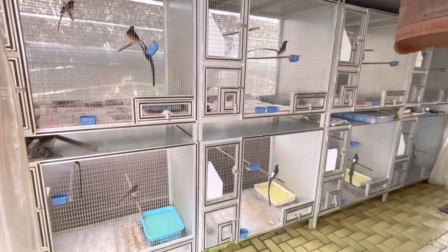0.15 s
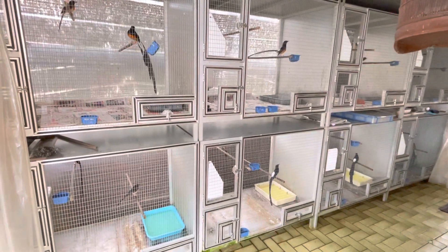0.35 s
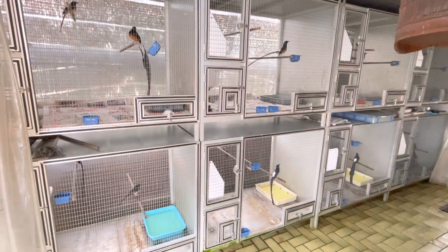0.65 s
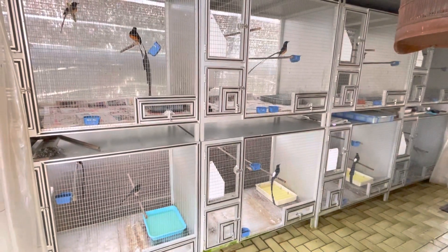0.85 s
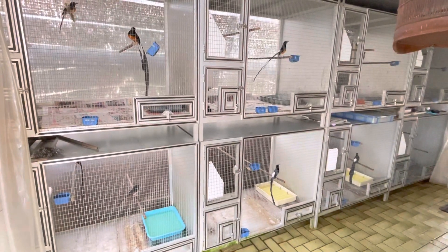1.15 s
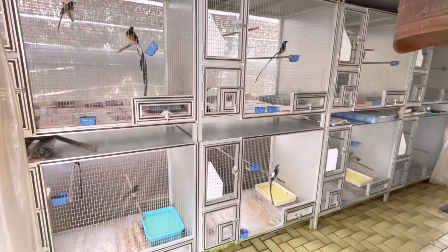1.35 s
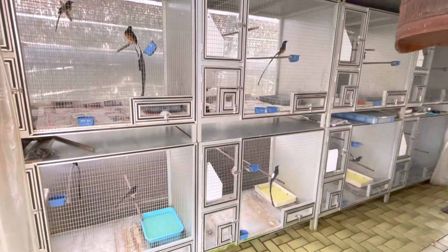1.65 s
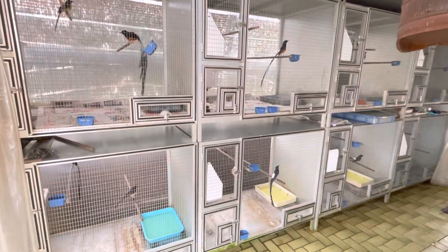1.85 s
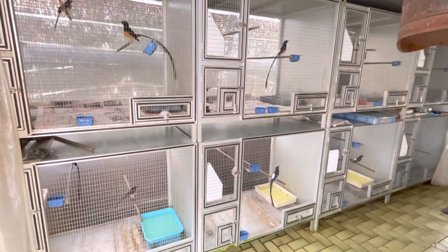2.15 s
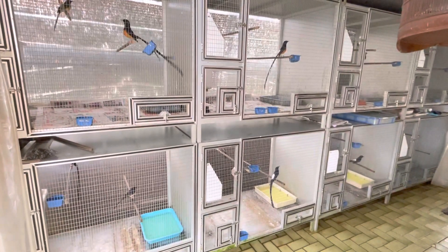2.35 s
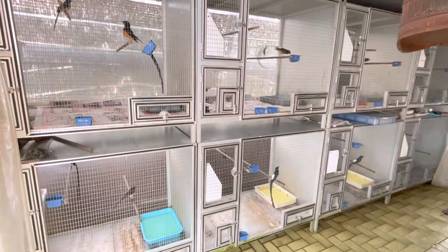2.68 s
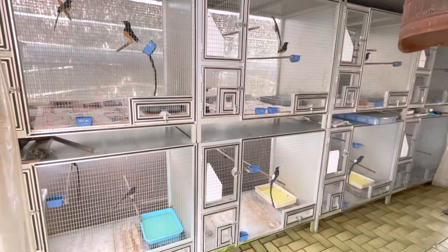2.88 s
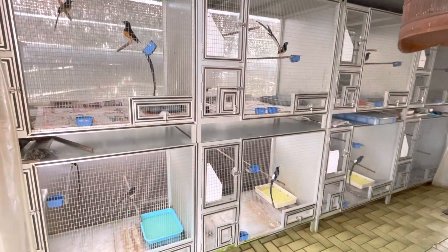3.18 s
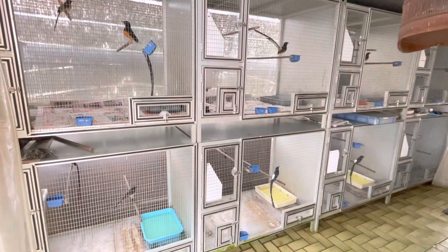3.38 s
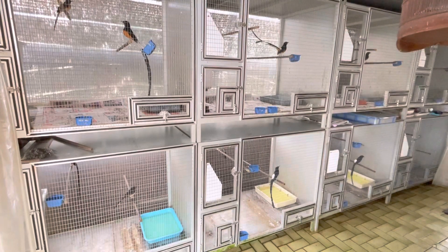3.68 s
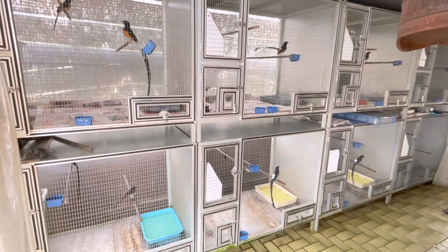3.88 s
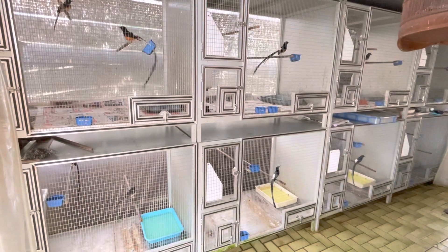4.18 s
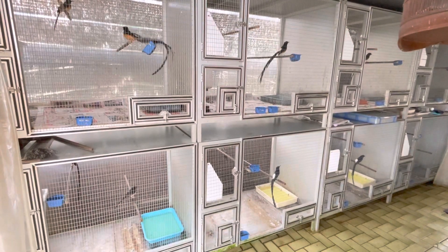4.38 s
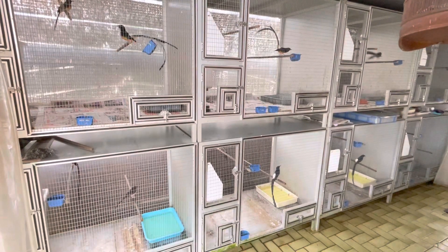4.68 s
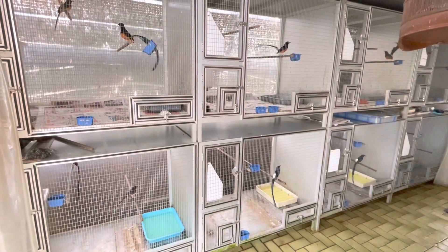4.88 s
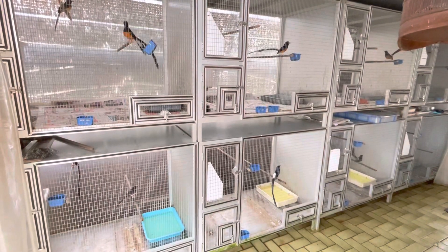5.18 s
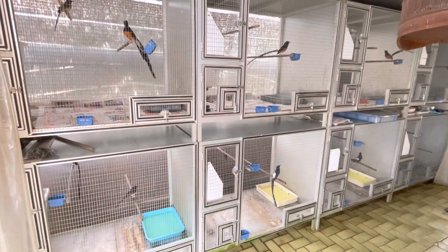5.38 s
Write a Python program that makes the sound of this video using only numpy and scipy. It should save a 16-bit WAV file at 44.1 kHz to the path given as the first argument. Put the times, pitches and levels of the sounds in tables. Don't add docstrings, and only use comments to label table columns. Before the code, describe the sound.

Several caged songbirds whistle over one another in gliding notes, with raspy scolding and sharp ticks, in an echoing tiled room with a low fan hum.

```python
import sys
import numpy as np
from scipy import signal
from scipy.fft import rfft, irfft
from scipy.io import wavfile
from scipy.ndimage import uniform_filter1d

SR = 44100
rng = np.random.default_rng(int(sys.argv[2]) if len(sys.argv) > 2 else 0)


def output_pcm(signal):
    pcm = np.clip(np.atleast_2d(signal).T, -1, 1) * 32767
    wavfile.write(sys.argv[1], SR, np.round(pcm).astype(np.int16))


def invert_db(level):
    return 10 ** (np.asarray(level, dtype=float) / 20)


N = 243873

# (share of its length [0-1], share of its glide [0-1], level [dB])
GLIDE = [(0, 0, -3), (0.4, 0.35, -2), (1.002, 0.93, -0.5)]
SCOOP = [(0, 0.029, -1.5), (.2, 0.66, -5.5), (.4, .94, -5), (1, 1, -17)]
DROP = [(0, 0.0038, -7), (0.299, 0.0573, 0.5), (.65, .6, -4), (1, 0.98, -12)]

FRONT_PAN_DB = 9.5
PORT_LAG = 10


def level(x, db):
    return x * invert_db(db) / np.sqrt(np.mean(x ** 2))


def over_hz(table, hz):
    f, v = np.transpose(table)
    return np.interp(np.log(np.maximum(hz, 1)), np.log(f), v)


def colour(x, table):
    hz = np.fft.rfftfreq(x.shape[-1], 1 / SR)
    return irfft(rfft(x) * invert_db(over_hz(table, hz)), x.shape[-1])


def walk(rate, size):
    k = int(SR / rate)
    held = np.repeat(rng.standard_normal(size // 128 + 1), k)[:size + k]
    return 1.366 * uniform_filter1d(uniform_filter1d(held, k), k)[:size]


def octave(hz, centre):
    return np.cos(np.pi / 2 * np.clip(np.log2((hz + 1) / centre), -1, 1)) ** 2


def add(out, t, x, pan_db, wall_share=0.37):
    i = int(t * SR)
    x = x[:N - i]
    sides = np.array([[1], [-1], [wall_share], [-wall_share]])
    out[:, i:i + len(x)] += x * invert_db(pan_db / 2 * sides)


def fan():
    # (frequency [Hz], level [dB])
    hum_tones = [(59.2, -54.5), (113.0, -52), (263.8, -49.5), (522.2, -63.5)]
    out = 0
    for hz, db in hum_tones:
        phase = 2 * np.pi * np.cumsum(hz * (1 + 0.00805 * walk(2.2, size=N))) / SR
        out = out + invert_db(db + 2.5 + 1.43 * walk(2.5, size=N)) * np.sin(phase)
    return out


def air():
    # (frequency [Hz], density [dB per Hz])
    air_spectrum = [(15, -63), (25, -1), (96, -8.5), (205, -10.5), (255, -10.5), (316, -12.5), (473, -16),
                    (1780, -9.5), (2970, -17.5), (5520, -27), (6140, -31.5), (8730, -34), (10800, -33),
                    (14600, -23), (15800, -89)]
    # (frequency [Hz], left-right correlation [-1 to 1])
    port_likeness = [(60, 0.97), (130, 1), (290, 0.4), (640, 0.049), (1400, 0.028)]
    hz = np.fft.rfftfreq(N, 1 / SR)
    like = np.clip(over_hz(port_likeness, hz), 0, 1)
    hiss = rfft(rng.standard_normal((2, N))) * invert_db(over_hz(air_spectrum, hz))
    mid, side = hiss * np.sqrt([1 + like, 1 - like])
    ports = np.array([mid + side, mid - side])
    out = 0
    for centre in 31.25 * 2. ** np.arange(10):
        out = out + irfft(ports * octave(hz, centre), N) * invert_db(2.0 * walk(4.884, size=N))
    return level(out * invert_db(np.array([[.8], [-.8]])), -41)


def whistles(notes, pans, shake=0.0067, shake_rate=70, overtone_db=-0.5):
    # (multiple of the pitch, level [dB])
    overtones = [(2, -37), (3, -31), (4, -43), (5, -32)]
    trim_db, edge_s = 2.5, 0.005
    out = np.zeros((4, N))
    for note, pan_db in zip(notes, pans):
        s, hz, db = np.transpose(note)
        t = np.arange(s[0], s[-1], 1 / SR)
        pitch_drift, breath = (walk(rate, size=2 * SR // 5)[:len(t)] for rate in (shake_rate, 60))
        hz = uniform_filter1d(np.interp(t, s, hz), int(0.008 * SR), mode="nearest")
        hz = hz * (1 + shake * np.tanh(pitch_drift))
        phase = 2 * np.pi * np.cumsum(hz) / SR
        tone = np.sin(phase)
        for k, over_db in overtones:
            tone += invert_db(over_db + overtone_db) * np.sin(k * phase) * (k * hz < .4 * SR)
        edges = np.sin(np.pi / 2 * np.clip(np.minimum(t - s[0], s[-1] - t) / edge_s, 0, 1))
        loudness = invert_db(np.interp(t, s, db) + trim_db + 4.49 * breath)
        add(out, s[0], tone * edges * loudness, pan_db)
    return out


def sing(rows, kind):
    along, glide, swell_db = np.transpose(kind)
    along = np.clip((along - along[0]) / (along[-1] - along[0]), 0, 1)
    return [np.transpose([s + length * along, hz + (to_hz - hz) * glide, db + swell_db])
            for s, length, hz, to_hz, db in rows]


def song():
    # (share of its length [0-1], share of its glide [0-1], level [dB])
    swell = [(0, 0, -10), (.6, 0.61, -8), (1, 1, -1.5)]
    pip = [(0, 0, 2.5), (1, 1, -19.5)]
    # (time [s], length [s], pitch [Hz], level [dB], left minus right [dB])
    pips = [(0, 0.051, 2310, -30.5, 21), (0.453, 0.12, 2324, -27, 10), (0.611, 0.055, 1740, -40.5, 12),
            (0.868, 0.1, 1540, -45, 7), (1.769, 0.021, 2620, -20.5, 3), (2.364, 0.12, 1145, -35, 9),
            (4.385, 0.027, 1072, -32.5, 5), (2.051, 0.034, 3660, -49.5, 5), (2.097, 0.036, 977, -36.5, 7),
            (2.239, 0.019, 1044, -28, -9.5), (2.981, 0.012, 4900, -16.5, 4), (3.08, 0.038, 3978, -18, 19.5),
            (4.122, 0.021, 1026, -29, 7), (4.25, 0.043, 1230, -35, -2), (5.183, 0.11, 1671, -22.5, 5.5)]
    # (time [s], length [s], from [Hz], to [Hz], level [dB])
    left_glides = [(0.216, 0.08, 2370, 2213, -34), (0.3, 0.058, 2074, 2040, -27),
                   (2.776, 0.053, 1353, 1252, -28), (0.401, 0.083, 1980, 1970, -32.5),
                   (0.517, 0.14, 2022, 2410, -27), (1.456, 0.038, 2618, 2720, -26.5),
                   (1.753, .16, 3095, 2839, -27), (2.621, 0.075, 1782, 1465, -34.5),
                   (2.798, .2, 2134, 2642, -33), (3.407, 0.031, 5090, 5070, -44),
                   (4.77, 0.18, 1498, 1528, -40.5), (5.302, 0.077, 1640, 1767, -29),
                   (5.385, 0.099, 1937, 1813, -25.5)]
    front_glides = [(.25, 0.19, 4423, 4130, -59), (.272, 0.024, 1950, 2040, -35),
                    (0.962, 0.086, 1844, 1714, -43), (1.369, 0.086, 1740, 2077, -23.5),
                    (1.61, 0.12, 1965, 1942, -29.5), (2.031, .17, 1548, 1996, -34.5),
                    (2.338, 0.11, 2114, 2060, -26), (2.512, 0.03, 2910, 2980, -41),
                    (2.478, 0.083, 2487, 2230, -41.5), (2.575, 0.27, 2277, 2708, -35.5),
                    (2.595, 0.023, 1710, 2120, -30), (3.705, 0.09, 1786, 2787, -23.5),
                    (1.75, 0.05, 992, 1157, -36), (4.522, 0.03, 3455, 3530, -31.5),
                    (4.492, 0.018, 1926, 4920, -23), (4.624, 0.022, 2050, 2244, -27),
                    (4.902, 0.054, 3070, 3015, -36.5)]
    left_swells = [
        (0.556, 0.119, 3070, 3176, -17),
        (0.946, 0.113, 1420, 1436, -27.5),
        (1.03, 0.028, 1970, 2080, -23),
        (2.981, 0.12, 2860, 3180, -25),
    ]
    front_swells = [
        (0.922, 0.047, 1570, 1903, -32),
        (1.215, 0.049, 3003, 4496, -22),
        (1.802, 0.13, 1284, 1807, -32),
        (2.099, 0.057, 2000, 2280, -38),
    ]
    left_scoops = [
        (2.793, 0.03, 3960, 4010, -37.5),
        (3.516, 0.084, 3100, 3490, -45),
        (3.825, 0.1, 2880, 3409, -29.5),
        (4.981, 0.28, 2233, 2947, -21.5),
    ]
    front_scoops = [
        (0.394, 0.049, 2870, 2960, -17),
        (0.81, 0.065, 2790, 2920, -20.5),
        (1.227, 0.1, 1690, 1845, -20.5),
        (4.522, .07, 4560, 4700, -35),
        (1.502, 0.17, 2410, 2560, -24),
        (2.495, 0.04, 3900, 4060, -38.5),
        (4.208, 0.05, 1810, 2066, -25.5),
        (2.995, 0.08, 3300, 3805, -21.5),
        (3.919, .12, 1554, 1575, -31),
        (4.775, 0.0444, 1585, 2080, -21),
    ]
    left_drops = [
        (.005, 0.034, 5590, 4080, -30),
        (2.723, 0.052, 1970, 1304, -21),
        (3.321, 0.12, 2289, 1035, -24),
        (3.927, 0.037, 3124, 2200, -25.5),
        (4.049, 0.054, 4104, 2560, -22),
        (5.338, 0.056, 1578, 1017, -25),
    ]
    front_drops = [
        (1.13, 0.039, 2075, 1800, -30.5),
        (1.92, 0.036, 1501, 990, -40),
        (3.11, 0.11, 3170, 3150, -33.5),
        (3.504, 0.041, 2435, 1730, -22),
        (3.688, 0.026, 2322, 1781, -31),
        (4.199, 0.038, 4170, 2670, -31.5),
        (4.325, .045, 2229, 1627, -27),
        (5.45, .045, 1856, 1120, -24),
    ]
    left_pan_db = 12.5
    low_voice_hz = 2500
    pip_lift = 0.022

    notes = sing([(s, length, hz, hz * (1 + pip_lift), db) for s, length, hz, db, _ in pips], pip)
    pans = [row[-1] for row in pips]
    for kind, left, front in ((GLIDE, left_glides, front_glides), (swell, left_swells, front_swells),
                              (SCOOP, left_scoops, front_scoops), (DROP, left_drops, front_drops)):
        notes += sing([*left, *front], kind)
        pans += [left_pan_db] * len(left) + [FRONT_PAN_DB] * len(front)

    placed = list(zip(notes, pans))
    low = [pair for pair in placed if np.mean(pair[0][:, 1]) < low_voice_hz]
    high = [pair for pair in placed if np.mean(pair[0][:, 1]) >= low_voice_hz]
    return whistles(*zip(*low), shake=.012) + whistles(*zip(*high))


def chatter():
    # (time [s], length [s], from [Hz], to [Hz], level [dB])
    rough_notes = [(0.3, 0.2, 1600, 3100, -37.5), (1.82, 0.19, 1540, 1626, -40),
                   (2, 0.16, 1837, 2202, -37.5), (2.5, .07, 3250, 2950, -41), (2.5, 0.02, 2000, 2900, -33),
                   (4.5, .05, 2350, 1950, -35), (.05, 0.2, 1700, 1900, -49), (4.5, .05, 3300, 2200, -31),
                   (0, .06, 3500, 3200, -49.5), (2.478, .06, 4700, 3300, -35.5),
                   (2, .07, 2900, 2900, -48.5), (4.5, .08, 4750, 4300, -35), (6, 0.047, 2500, 1400, -38)]
    return whistles(sing(rough_notes, GLIDE), [10] * len(rough_notes), shake=.09, shake_rate=200)


def buzzes():
    # (time [s], length [s], from [Hz], to [Hz], level [dB])
    buzzy_notes = [
        (.01, 0.052, 5313, 4610, -31),
        (2.474, 0.03, 4490, 4010, -39.5),
        (3.5, 0.096, 2400, 1930, -52),
        (4.21, 0.039, 3950, 2896, -29.5),
        (4.505, 0.078, 3426, 2973, -24.5),
        (4.515, 0.044, 4320, 3630, -32),
    ]
    pans = [14.5] * len(buzzy_notes)
    return whistles(sing(buzzy_notes, DROP), pans, shake=.12, shake_rate=300, overtone_db=16)


def links():
    # (time [s], length [s], from [Hz], to [Hz], level [dB])
    plain_notes = [(.1, .11, 2308, 2320, -52), (.372, 0.025, 2715, 2800, -32.5),
                   (1.175, 0.055, 2610, 3080, -37.5), (.79, 0.027, 2665, 2810, -39.5),
                   (1.068, .026, 1456, 1477, -31.5), (1.11, 0.037, 1452, 1492, -27),
                   (.408, 0.028, 2920, 2917, -22), (5.13, .1, 2933, 2942, -28),
                   (5.36, .05, 1322, 1057, -34), (5.48, .035, 1500, 1155, -33),
                   (3.41, .05, 1451, 1047, -34.5), (3.8, .125, 950, 1615, -35),
                   (3.97, .06, 3610, 3600, -46), (4.065, 0.046, 3900, 3855, -31),
                   (4.474, .018, 2285, 2750, -32), (2.065, .07, 1730, 1838, -30.5),
                   (2.14, 0.062, 2102, 2415, -39.5), (2.3, 0.02, 1040, 1040, -51),
                   (2.337, 0.021, 2335, 1613, -27), (2.385, 0.023, 1310, 1330, -40),
                   (2.576, 0.019, 1670, 1675, -31), (2.82, 0.028, 4050, 4450, -53),
                   (3.13, .11, 3580, 3180, -31), (4.365, .022, 1657, 1080, -35),
                   (4.525, 0.027, 4660, 4620, -41), (4.545, 0.028, 4120, 3950, -30),
                   (4.552, 0.024, 3085, 3060, -34), (4.64, .036, 2243, 2267, -25.5)]
    reedy_notes = [
        (1.33, .22, 3500, 3790, -38),
        (1.56, .23, 3330, 3557, -45.5),
        (2.98, .09, 4894, 4820, -30),
        (3.0, .07, 3490, 3800, -33.5),
    ]
    plain = whistles(sing(plain_notes, GLIDE), [FRONT_PAN_DB] * len(plain_notes))
    reedy_pans = [FRONT_PAN_DB] * len(reedy_notes)
    return plain + whistles(sing(reedy_notes, SCOOP), reedy_pans, shake=.025, shake_rate=150, overtone_db=13)


def rasps(pulse_hz=420, jitter=.35, breath=0.15, trim_db=-9):
    # (time [s], peak level [dB], length [s], throat resonance ratio, left minus right [dB])
    rasp_calls = [(1.249, -28.5, 0.03, 1.41, 13), (1.456, -32, 0.041, 0.91, 14),
                  (2.493, -41.5, 0.093, 1.01, 18), (2.696, -33.5, 0.093, 0.924, 18),
                  (2.883, -33, 0.11, 0.86, 10), (2.985, -32.5, 0.077, 1.17, 16.5),
                  (3.205, -33.5, 0.13, 0.93, 11), (3.629, -32, 0.11, 0.91, 13.5),
                  (3.914, -40.5, 0.079, 1.27, 10), (4.061, -34, 0.042, 1.2, 16),
                  (4.49, -35, 0.11, 1.22, 19), (4.712, -22.5, 0.099, 0.78, 12),
                  (4.923, -12.5, 0.016, 0.47, 2)]
    # (frequency [Hz], width [Hz], level [dB])
    throat_modes = [(3320, 610, 7), (4480, 1300, 7.5), (6220, 880, 13.5), (8150, 430, -34),
                    (12200, 1200, -57.5), (14600, 5100, 2.5)]
    out = np.zeros((4, N))
    t = np.arange(SR // 4) / SR
    hz = np.fft.rfftfreq(len(t), 1 / SR) + 1
    for s, db, length, throat, pan_db in rasp_calls:
        chance = rng.standard_normal((3, len(t)))
        unsteady = uniform_filter1d(chance[0], size=64) * np.sqrt(64)
        turns = np.cumsum(pulse_hz * (1 + jitter * unsteady)) / SR
        slaps = (np.diff(np.floor(turns), prepend=0) > 0) * invert_db(5.0 * chance[1])
        drive = level(slaps, 0) + breath * chance[2]
        body = sum(invert_db(g) / (1 + 1j * (hz ** 2 - (f * throat) ** 2) / (hz * w)) for f, w, g in throat_modes)
        shape = np.clip(t / 0.0023, .3, 1) * np.clip((length - t) / 0.045, 0, 1)
        shape = shape * invert_db(3.2 * walk(89, size=len(t)))
        add(out, s, level(irfft(rfft(drive) * body, len(t)), db + trim_db) * shape, pan_db)
    return out


def ticks(snap_s=0.00081, rattle_s=0.012, rattle_db=1.0, trim_db=-11):
    # (time [s], peak level [dB], left minus right [dB])
    tick_calls = [
        (1.716, -39.5, 18),
        (1.804, -26.5, 24),
        (2.0075, -26, 20.5),
        (2.248, -39, 34.5),
        (4.154, -21.5, 13),
        (4.3786, -22.5, 15),
        (4.7094, -24, 14),
        (4.9744, -21, 15.5),
        (5.171, -19.5, 5.5),
    ]
    # (frequency [Hz], density [dB per Hz])
    tick_tint = [(1940, -48.5), (3300, -14), (5540, -10), (6030, -5.5), (7490, -14), (8260, -16),
                 (9480, -24.5), (14400, -13.5), (15800, -17.5)]
    out = np.zeros((4, N))
    t = np.arange(SR // 10) / SR
    fall = np.exp(-t / snap_s) + invert_db(rattle_db) * np.exp(-t / rattle_s)
    for s, db, pan_db in tick_calls:
        noise = colour(rng.standard_normal(len(t)), [(1500, -69.0)] + list(tick_tint))
        add(out, s, level(noise, 0) * fall * invert_db(db + trim_db), pan_db)
    return out


def room(x, first_s=0.0013, build_s=0.0045, near_s=0.058, near_db=9, wet_db=4.0):
    # (frequency [Hz], time to fall 60 dB [s])
    decay_times = [(500, 0.43), (2000, 0.7), (5000, 0.61), (12000, 0.66)]
    t = np.arange(SR) / SR
    hz = np.fft.rfftfreq(SR, 1 / SR)
    noise = rfft(rng.standard_normal((2, SR)))
    tail = 0
    for centre in 250 * 2. ** np.arange(7):
        decay = invert_db(-60 * t / over_hz(decay_times, centre))
        tail = tail + irfft(noise * octave(hz, centre), SR) * decay
    tail = tail * np.clip((t - first_s) / build_s, 0, 1) * (1 + invert_db(near_db) * np.exp(-t / near_s))
    tail = tail * invert_db(wet_db) / np.sqrt(np.sum(tail ** 2, axis=1, keepdims=True))
    return signal.fftconvolve(x, tail, axes=1)[:, :N]


def scene():
    birds = song() + buzzes() + rasps()
    near = ticks()
    heard = invert_db(-5) * birds[:2] + near[:2]
    heard = heard + room(birds[2:] + invert_db(-6.5) * near[2:])
    heard[0] = np.roll(heard[0], PORT_LAG)
    heard = heard + fan() + air()
    far = chatter()
    link_notes = links()
    straight = invert_db(-0.5) * np.array([np.roll(link_notes[0], PORT_LAG), link_notes[1]])
    return heard + straight + room(far[2:] + link_notes[2:])


def gain_control(x, knee_db=-27, squeeze=0.11, release_s=0.18):
    keep = np.exp(-1 / (release_s * SR))
    power = signal.lfilter([1 - keep], [1, -keep], np.mean(x ** 2, axis=0))
    return x * (1 + power / invert_db(2 * knee_db)) ** (-squeeze / 2)


def thin_masked_bands(x, mask_db=-21, top_db=-88, sparse_db=-0.5, patchy_db=9, size=2048, count=12):
    _, _, z = signal.stft(x, nperseg=size)
    bands = np.arange(z.shape[1]) // count
    power = np.add.reduceat(np.abs(z) ** 2, np.arange(0, z.shape[1], count), axis=1) / count
    hz = (np.arange(power.shape[1]) + .5) * count * SR / size
    top = hz[:, None] > 10000

    octaves_up = np.log2(hz[:, None] / hz)
    above = (octaves_up > 0) * (hz > 1500) * (hz[:, None] < 5700)
    spread = invert_db(2 * (mask_db - 40 * octaves_up)) * above
    hidden = np.max(spread[:, :, None] * uniform_filter1d(power, size=3)[:, None], axis=2)

    patches = uniform_filter1d(rng.standard_normal(power.shape[1:]), size=5)
    patches = uniform_filter1d(patches, size=4, axis=0) * 1.3 * patchy_db
    usual = np.median(power, axis=2, keepdims=True)
    hidden += np.maximum(power, usual) * invert_db(2 * patches - 3) * top
    kept = (1 / (1 + (hidden / (power + 1e-20)) ** 6))[:, bands]

    faint = (invert_db(2 * top_db) + invert_db(2 * sparse_db) * power) * top
    kept = kept / (1 + (faint[:, bands] / (np.abs(z) ** 2 + 1e-20)) ** 6)
    return signal.istft(z * kept, nperseg=size)[1][:, :N]


def low_pass(x):
    return signal.sosfilt(signal.butter(12, 16530, fs=SR, output="sos"), x)


def record(dry):
    # (frequency [Hz], gain [dB])
    port_response = [(28, -34.5), (42, 2.5), (5000, -1.05), (5500, -7), (5900, 0.5), (7200, 1.5),
                     (7600, -9.5), (8000, 3), (15600, -8), (15900, -31)]
    left, right = thin_masked_bands(gain_control(colour(dry, port_response)))
    mid = (left + right) / 2
    side = colour((left - right) / 2, [(10500, 0), (11300, -12)])
    return low_pass(np.array([mid + side, mid - side]))


dry = scene()
out = record(dry)
output_pcm(out)
```